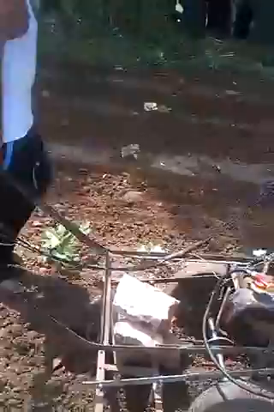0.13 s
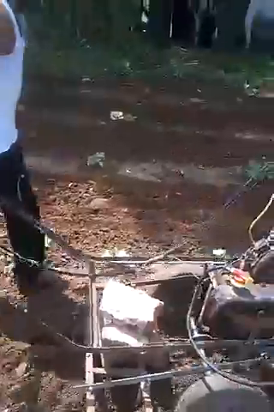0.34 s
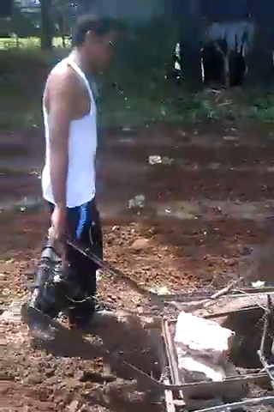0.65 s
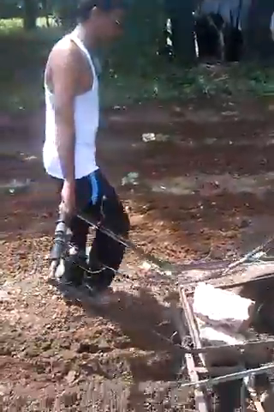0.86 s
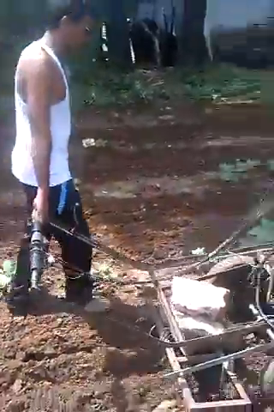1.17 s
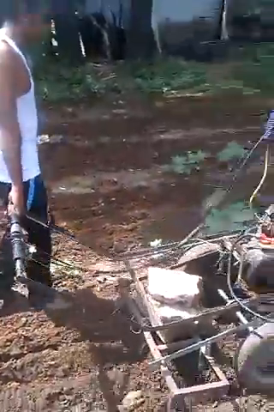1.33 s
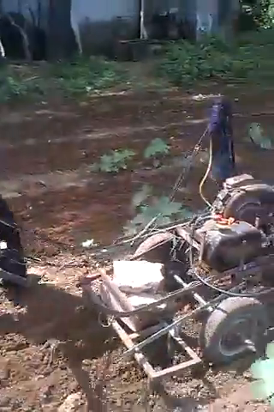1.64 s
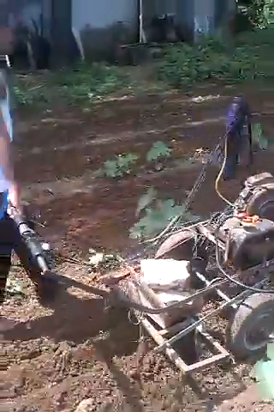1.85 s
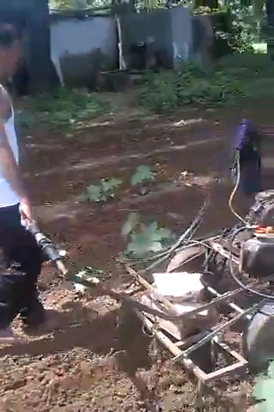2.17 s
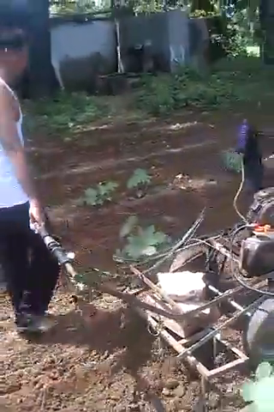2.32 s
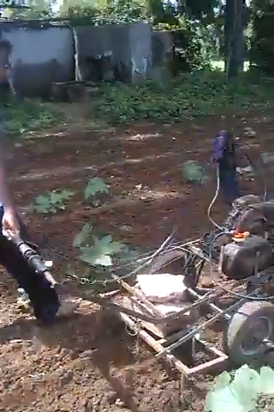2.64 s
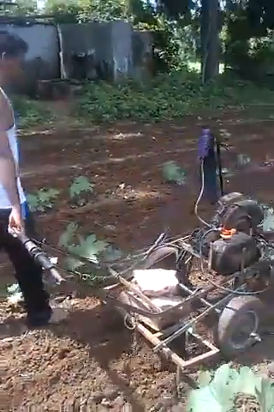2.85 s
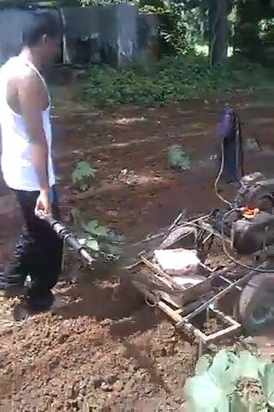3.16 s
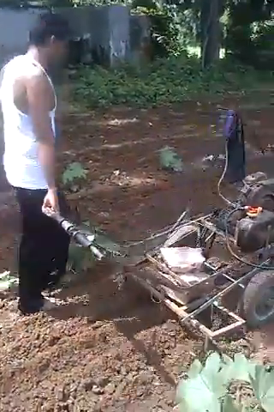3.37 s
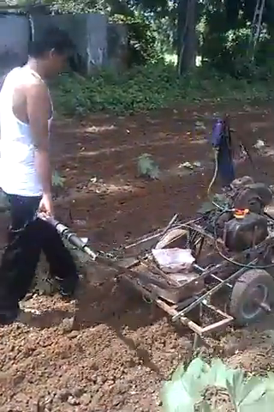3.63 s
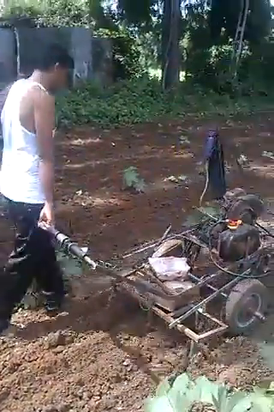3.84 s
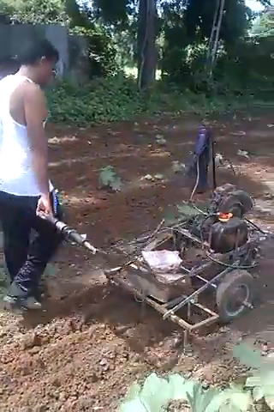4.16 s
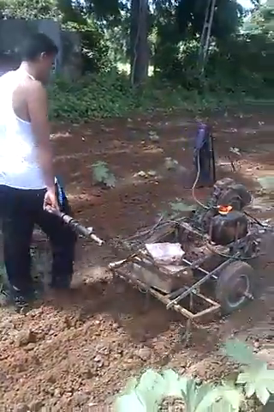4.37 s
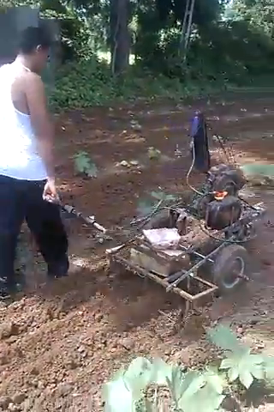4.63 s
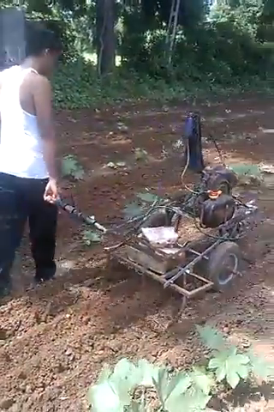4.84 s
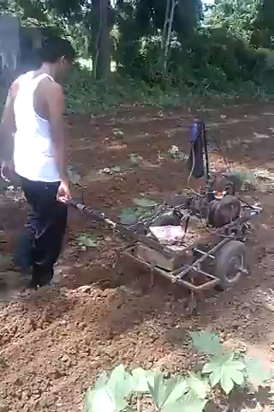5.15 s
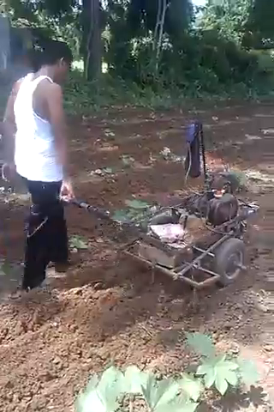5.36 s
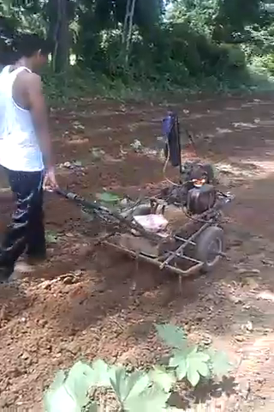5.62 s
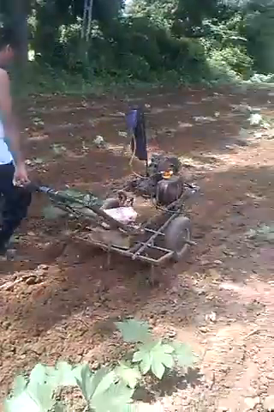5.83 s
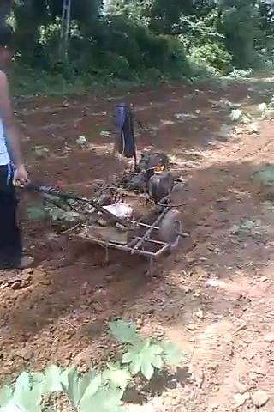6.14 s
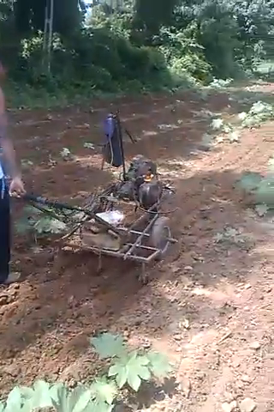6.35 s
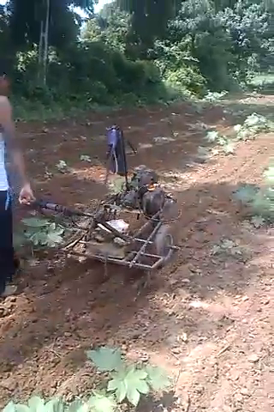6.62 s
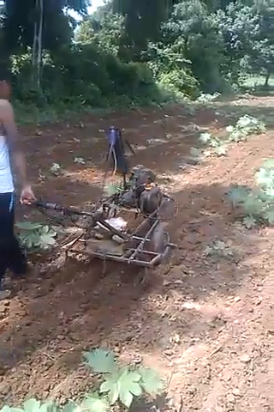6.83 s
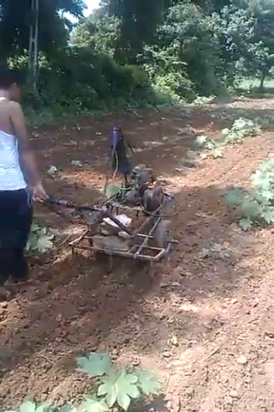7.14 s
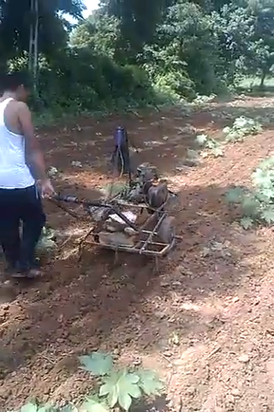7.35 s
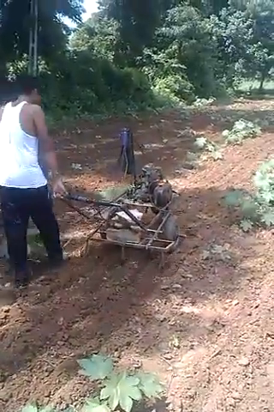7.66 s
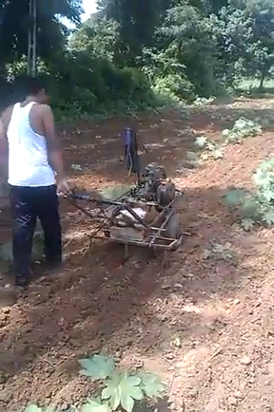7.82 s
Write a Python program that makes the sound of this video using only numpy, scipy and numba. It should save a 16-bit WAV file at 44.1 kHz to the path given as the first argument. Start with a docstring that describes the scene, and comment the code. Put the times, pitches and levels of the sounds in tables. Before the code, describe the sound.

A small engine chugs and clatters nearby until a loud scrape on the microphone leaves it faint and muffled.

```python
"""In a field, on a hand-held phone, close to a homemade cultivator dragged by a scooter engine.
Each cycle of the four-stroke single gives an intake honk, a knock and an exhaust puff over repeating
clatter, while the tines scratch through dry soil. The hand bumps the case and air buffets the microphone.
A finger slides over the microphone port, scrapes it into overload and stays there,
leaving the engine faint and muffled as it draws away."""
import sys
import numpy as np
from scipy import signal
from scipy.fft import rfft, irfft, next_fast_len
from scipy.io import wavfile
from scipy.ndimage import uniform_filter1d
from numba import njit

SR = 44100
rng = np.random.default_rng(int(sys.argv[2]) if len(sys.argv) > 2 else 0)


def master(y):
    """Save y as 16-bit WAV."""
    cut = np.clip(np.atleast_2d(y).T, -1, 1)
    pcm = np.round(cut * 32767)  # scale
    wavfile.write(sys.argv[1], SR, pcm.astype(np.int16))


N = 352355
TIME = np.arange(N) / SR

# engine speed under the changing load: time_s, firing_rate_hz
ENGINE_SPEED = [(0.0, 20.41), (0.29, 20.48), (0.53, 21.35), (0.92, 21.49), (1.34, 20.44), (1.99, 22.57),
                (2.54, 20.13), (3.4, 21.01), (4.04, 22.66), (4.41, 20.31), (4.68, 22.23), (5.4, 20.79),
                (5.87, 19.03), (6.34, 22.49), (6.79, 21.06), (7.79, 20.52), (8.0, 22.52)]
# ringing of casing, chain and frame: frequency_hz, gain_db
CASING_SPECTRUM = [(130, -2), (250, -1.5), (480, 1.5), (570, -5.5), (760, 4), (825, -1), (895, -1),
                   (1200, -2), (1450, -2), (1800, -11), (2350, -13), (2950, -7.5), (4200, -14.5),
                   (8000, -31)]
# resonances of cooling fins and tin covers, and a narrow ring near 5.5 kHz: pitch_hz, width_hz, gain_db
FIN_MODES = [(893, 14, 10), (995, 30, 5.5), (1460, 21, 1), (2070, 34, -5), (2836, 98, -7.5),
             (3520, 190, -10.5), (5500, 43, 5), (5830, 170, 3)]
# sharp exhaust puff: frequency_hz, gain_db
PUFF_SPECTRUM = [(700, -17), (1350, 7.5), (2100, -2), (3200, -3.5), (4300, -4), (5700, 9), (7500, -5),
                 (9000, -13.5), (11000, -4.5), (12000, -5), (13000, -8), (15500, -17)]
# gas hiss in the silencer outlet: frequency_hz, gain_db
SILENCER_SPECTRUM = [(2000, -17), (4200, -10.5), (5100, -5.5), (5750, -4), (6600, -12.5), (7600, -14),
                     (9000, -22), (12000, -25.5), (15500, -43)]
# the tines biting into dry soil: start_s, length_s, gain_db
TINE_BITES = [(1.475, .53, -35.5), (2.153, 0.38, -44.5)]
# gritty hiss of soil on steel: frequency_hz, gain_db
GRIT_SPECTRUM = [(1500, -9), (3500, -4.5), (7000, 4), (10000, 3), (13000, -1), (15500, -2.5)]
# what leaks past a finger on the microphone port: frequency_hz, gain_db
LEAK_SPECTRUM = [(30, 19.5), (70, 13.5), (150, 10), (310, 5.5), (410, 2), (520, -1.5), (700, 1), (950, -5),
                 (1250, -10.5), (2000, -10), (2550, -18.5), (3250, -10), (4000, -17), (5700, -27)]
# the finger rubbing across the port: start_s, length_s, level_db, corner_hz
PORT_RUBS = [(2.615, 0.049, -26.5, 210), (2.662, 0.36, -27, 24), (3.017, 0.035, -9, 70),
             (3.06, 0.044, -5, 185), (3.109, 0.055, 2.5, 680), (3.167, 0.071, -23.5, 1700),
             (3.248, 0.039, 2.5, 760), (3.308, .12, -27, 372)]
# skin snapping off the phone's case: start_s, peak_db, swing_hz, click_db
SKIN_SNAPS = [(3.011, -12, 70, -60), (3.3503, -8, 1140, -35), (3.403, -5, 533, -12)]
# bumps on the case, mostly from the hand; the faint one at 4.219 s falls with a firing: start_s, knock_gain_db,
# push_gain_db
HAND_BUMPS = [(0.426, -18.5, -39), (0.523, -18.5, -20), (1.074, -17, -20.5), (1.409, -15, -20),
              (1.533, -9.5, -19.5), (1.599, -13.5, -17), (1.635, -20.5, -21), (1.763, -15, -29.5),
              (2.423, -38, -24), (3.573, -18.5, -34), (3.632, -18.5, -40), (3.754, -22, -29),
              (3.957, -19, -51), (4.006, -26.5, -45), (4.057, -26.5, -41), (4.219, -36.5, -41),
              (4.424, -34, -24), (4.656, -28.5, -24.5), (5.56, -22.5, -38), (5.678, -30, -38),
              (6.056, -31.5, -45), (6.232, -31.5, -40), (7.089, -47.5, -31.5), (7.879, -22, -26),
              (7.908, -29, -27)]
# what the case passes on of a bump: frequency_hz, gain_db
PHONE_CASE_SPECTRUM = [(40, -3), (130, 2.5), (280, -1), (500, -6.5), (750, -18.5), (1200, -29), (3000, -77),
                       (8000, -94)]
# the finger gliding over the case: start_s, length_s, level_db
SKIN_GLIDES = [(2.562, 0.293, -40.5), (6.673, 0.046, -48)]
# hiss of gliding skin: frequency_hz, gain_db
GLIDE_SPECTRUM = [(300, 6), (700, -1.5), (1200, 4), (1900, -0.5), (2400, -10), (3600, -14.5), (5800, -24),
                  (7000, -55), (14000, -55)]
# air buffeting the microphone: frequency_hz, gain_db
BUFFET_SPECTRUM = [(10, 4), (28, 6.5), (60, 3.5), (120, -12.5), (250, -30), (600, -43), (2000, -84)]
# microphone self-noise: frequency_hz, gain_db
SELF_NOISE_SPECTRUM = [(100, 4), (1500, 10.5), (4000, 2.5), (8000, -0.5), (15500, -5)]

# the finger covers the port, slips off it once and settles again
COVER_S, COVER_TAKES_S, SLIP_S, SLIP_LASTS_S = 2.376, .33, 3.12, .18


def intake_honk(cycle):
    """Each gulp of air, part pulse and part rush, swells and dies in the air pipe's resonance."""
    gulp = strokes(cycle, place=-.385, scatter_db=3.1, jitter_s=0.00021)
    rush = rng.standard_normal(N) * window(cycle, place=-0.37, width=0.22)
    pulse, air_flow = (ring(ring(ring(x, 420, 85), 413, 100), 394, 140) for x in (gulp, rush))
    return level(pulse, -1) + level(air_flow, -8)


def clatter(cycle):
    """Valve gear and chain rattle, hardest at combustion and again about a third of a cycle later."""
    combustion = window(cycle, place=-0.0446, width=0.12) * undb(2 * walk(21))
    force = 1 + 0.65 * combustion + 0.81 * window(cycle, place=0.33, width=0.086)
    contacts = rattle(cycle, fresh=0.96) * force * undb(2 * walk(260))
    casing = colour(contacts, CASING_SPECTRUM)
    fins = sum(undb(db) * ring(contacts, hz, width_hz) for hz, width_hz, db in FIN_MODES)
    frame = ring(ring(contacts, 312.8, 23.6), 306.5, 29.8)
    return level(casing, -0.36) + level(ring(fins, 2000, 10600), -7.5) + level(frame, -12)


def rattle(cycle, fresh):
    """The same train of tiny contacts comes back on every cycle, mixed with new ones."""
    restarts = np.diff(np.floor(cycle + .5), prepend=0) > 0
    age = np.arange(N) - np.maximum.accumulate(np.where(restarts, np.arange(N), 0))
    pattern = level(irfft(np.exp(2j * np.pi * rng.random(SR // 40))), 0)
    return pattern[age % len(pattern)] + fresh * rng.standard_normal(N)


def exhaust(cycle):
    """The exhaust valve lets out a low thud and a sharp puff, then gas hisses on through the silencer."""
    blow = strokes(cycle, place=-0.073, scatter_db=3, jitter_s=0.00085)
    thud = ring(ring(blow, 66, 70), 105, 140)
    burst = rng.standard_normal(N) * window(cycle, place=0.0079, width=0.039)
    puff = colour(burst * undb(4.1 * walk(20.97)), PUFF_SPECTRUM)
    flow = 1 + 1.14 * window(cycle, place=-0.0036, width=0.081)
    flow += 0.33 * window(cycle, place=-0.33, width=0.29)
    hiss = colour(rng.standard_normal(N) * flow * undb(2 * walk(120)), SILENCER_SPECTRUM)
    return level(thud, -6.5) + level(puff, -7) + level(hiss, -3.1)


def combustion_knock(cycle):
    """Each firing knocks dully on the block."""
    firing = rng.standard_normal(N) * window(cycle, place=-0.072, width=0.05)
    return level(ring(ring(firing, 840, 760), 910, 920), -12)


def tines():
    """Crumbs of soil scratch along the steel each time it bites."""
    crumbs = rng.standard_normal(N) * undb(2.6 * walk(500) + 2 * walk(31.62))
    bite = sum(undb(db) * swell(start, length, edge_s=0.16) for start, length, db in TINE_BITES)
    return level(colour(crumbs, GRIT_SPECTRUM), 0) * bite


def drawing_away(leaves_s=3.1, near_m=1.4, speed_m_per_s=0.37):
    """Gain that falls with distance as the machine moves off from the microphone."""
    distance_m = near_m + speed_m_per_s * np.maximum(TIME - leaves_s, 0)
    return near_m / distance_m


def port_opening():
    """Share of the microphone port that the finger leaves free."""
    slip = swell(SLIP_S, SLIP_LASTS_S, edge_s=0.035)
    return np.clip(1 - ramp(COVER_S, COVER_TAKES_S) + slip, 0, 1)


def past_finger(intake, knock, body, soil):
    """The closing port takes the treble first; covered, it leaves a dull leak, more knock than honk."""
    engine_gain_db, shut_hz, sweep_hz = -28, 20, 16600
    pressed_db, resting_db = -48.12, -35.12  # leak gain: the finger rests more lightly after the slip
    free = port_opening()
    outside = (intake + knock + body) * undb(engine_gain_db) + soil
    through_port = lowpass(outside, shut_hz + sweep_hz * free ** 3.68)
    leak = level(colour(body + undb(-9) * intake + undb(5) * knock, LEAK_SPECTRUM), 0)
    leak_db = pressed_db + (resting_db - pressed_db) * ramp(SLIP_S, SLIP_LASTS_S)
    return through_port + leak * (1 - free) * undb(leak_db)


def finger_rubs(attack_s=.005, release_s=0.0062, rasp_ratio=4.14, rasp_db=-24.5):
    """Skin sticks and slips right on the port, brighter the faster it slides; its ridges add a rasp."""
    out = np.zeros(N)
    slips = rng.standard_normal(N) * undb(2 * walk(300))
    for start, length, db, hz in PORT_RUBS:
        corner_hz = np.full(N, float(hz))
        grain = lowpass(slips, corner_hz) + undb(rasp_db) * lowpass(slips, rasp_ratio * corner_hz)
        fade = np.maximum((start - TIME) / attack_s, (TIME - start - length) / release_s)
        touch = np.exp(-np.clip(fade, 0, 20))
        out += undb(db) * touch * grain / np.sqrt(np.average(grain ** 2, weights=touch))
    return out


def skin_snaps(click_decay_s=0.00025):
    """Skin snaps off the case with one pressure swing and a click."""
    out, t = np.zeros(N), np.arange(SR // 4) / SR
    for start, db, hz, click_db in SKIN_SNAPS:
        add(out, start, undb(db) * push(t, hz) + undb(click_db) * np.exp(-t / click_decay_s))
    return out


def hand_bumps(shudder_t60_s=0.2):
    """Each bump pushes the phone's case once and leaves a short shudder in it."""
    out, shudder, t = np.zeros(N), np.zeros(N), np.arange(SR // 4) / SR
    for start, knock_db, push_db in list(HAND_BUMPS) + grip_shifts():
        add(shudder, start, undb(knock_db) * np.exp(-np.log(1000) * t / shudder_t60_s))
        add(out, start, undb(knock_db - 5.5) * push(t, hz=257))
        add(out, start, undb(push_db + 4.5) * push(t, hz=79))
    return out + undb(12.5) * colour(shudder * rng.standard_normal(N), PHONE_CASE_SPECTRUM)


def grip_shifts(count=14, knock_gain_db=-34.5, push_gain_db=-37, scatter_db=3):
    """Small shifts of the grip give faint bumps at random moments, as rows like those of HAND_BUMPS."""
    offset_db = rng.standard_normal((count, 2)) * scatter_db
    starts = (np.arange(count) + rng.random(count)) / count * TIME[-1]
    return list(zip(starts, knock_gain_db + offset_db[:, 0], push_gain_db + offset_db[:, 1]))


def finger_glides():
    """Skin sliding lightly on the case gives a soft, hollow hiss."""
    touch = sum(undb(db) * swell(start, length, edge_s=0.032) for start, length, db in SKIN_GLIDES)
    friction = rng.standard_normal(N) * undb(2 * walk(68))
    return level(colour(friction, GLIDE_SPECTRUM), 0) * touch


def air_buffet(open_db=-33.5, covered_db=-39.5):
    """Gusts rumble on the microphone, weaker once the port is covered."""
    gusts = rng.standard_normal(N) * undb(2.6 * walk(10))
    return level(colour(gusts, BUFFET_SPECTRUM), covered_db + (open_db - covered_db) * port_opening())


def microphone_hiss():
    """The microphone's even self-noise lies under everything."""
    return level(colour(rng.standard_normal(N), SELF_NOISE_SPECTRUM), -62.5)


def window(cycle, place, width):
    """A bell that opens once a cycle; place and width are shares of the cycle."""
    offset = (cycle - place + .5) % 1 - .5
    return np.exp(-(offset / width) ** 2 / 2)


def strokes(cycle, place, scatter_db, jitter_s):
    """One impulse a cycle, each a little different in size and time."""
    onsets = np.flatnonzero(np.diff(np.floor(cycle - place)) > 0)
    chance = rng.standard_normal((len(onsets), 2))
    onsets += (jitter_s * SR * chance[:, 0]).astype(int)
    out = np.zeros(N)
    out[np.clip(onsets, 0, N - 1)] = undb(scatter_db * chance[:, 1])
    return out


def push(t, hz):
    """A single pressure swing with a weaker rebound, peak 1."""
    swing = np.sin(2 * np.pi * hz * t) * np.exp(-2.5 * hz * t) * (1 - np.exp(-8 * hz * t))
    return -swing / np.abs(swing).max()


def ramp(start_s, length_s):
    """An even rise from 0 to 1."""
    return np.clip((TIME - start_s) / length_s, 0, 1)


def swell(start_s, length_s, edge_s):
    """Soft attack, hold and soft release, peak 1."""
    rise = ramp(start_s - edge_s / 2, edge_s)
    fall = ramp(start_s + length_s - edge_s / 2, edge_s)
    return np.sin(np.pi / 2 * (rise - fall)) ** 2


def walk(rate_hz):
    """A random wander with a spread near 1."""
    hold = int(SR / rate_hz)
    steps = np.repeat(rng.standard_normal(N // hold + 1), hold)
    return uniform_filter1d(steps, hold)[:N] * np.sqrt(3 / 2)


def colour(x, spectrum):
    """Filter by rows of frequency_hz, gain_db."""
    hz, db = np.transpose(spectrum)
    size = next_fast_len(N + SR // 2)
    bins_hz = np.maximum(np.fft.rfftfreq(size, 1 / SR), 1)
    gain = undb(np.interp(np.log(bins_hz), np.log(hz), db))
    return irfft(rfft(x, size) * gain, size)[:N]


def ring(x, hz, width_hz):
    """One resonance, gain 1 at its centre."""
    return signal.lfilter(*signal.iirpeak(hz, hz / width_hz, fs=SR), x)


@njit
def lowpass(x, hz):
    """Two-pole low-pass whose corner may move."""
    y, band, low = np.empty(len(x)), 0., 0.
    for i in range(len(x)):
        g = np.tan(np.pi * min(hz[i], .45 * SR) / SR)
        v = (band + g * (x[i] - low)) / (1 + g * (g + 1.3))
        y[i] = low + g * v
        band, low = 2 * v - band, 2 * y[i] - low
    return y


def undb(db):
    """Decibels to gain."""
    return 10 ** (np.asarray(db) / 20)


def level(x, db):
    """Scale to an rms level."""
    return x * undb(db) / np.sqrt(np.mean(x ** 2) + 1e-18)


def add(out, start_s, sound):
    """Mix a sound in at a time."""
    i = int(start_s * SR)
    out[i:i + len(sound)] += sound[:N - i]


def scene():
    """One microphone hears the machine past the finger, along with all that touches the phone."""
    firing_rate_hz = np.interp(TIME, *np.transpose(ENGINE_SPEED))
    cycle = .36 + np.cumsum(firing_rate_hz) / SR  # counts up by one per firing
    intake = intake_honk(cycle)
    body = clatter(cycle) + exhaust(cycle)
    knock = combustion_knock(cycle)
    machine = past_finger(intake, knock, body, tines()) * drawing_away()
    handling = finger_glides() + finger_rubs() + skin_snaps() + hand_bumps()
    return (machine + handling + air_buffet() + microphone_hiss())[None]


def record(dry):
    """The phone's input clips hard and the highest treble is cut."""
    clip_level, top_hz = .71, 15900
    treble_cut = signal.ellip(8, .2, 70, top_hz, fs=SR, output="sos")
    return signal.sosfilt(treble_cut, np.clip(dry, -clip_level, clip_level))


dry = scene()
out = record(dry)
master(out)
```